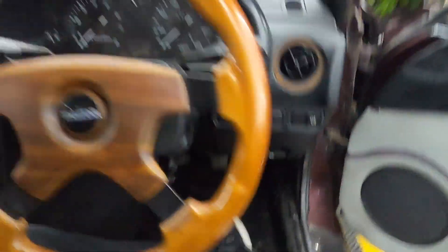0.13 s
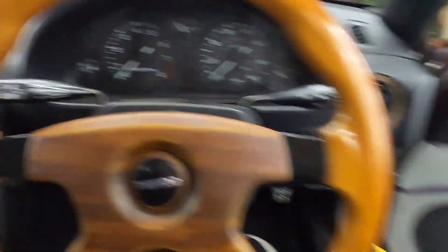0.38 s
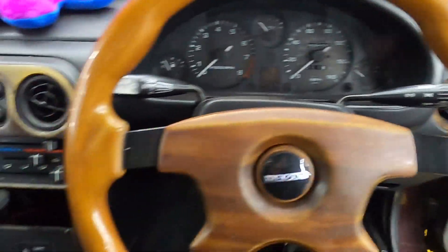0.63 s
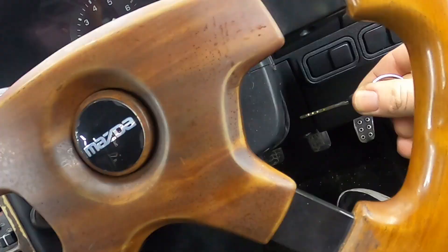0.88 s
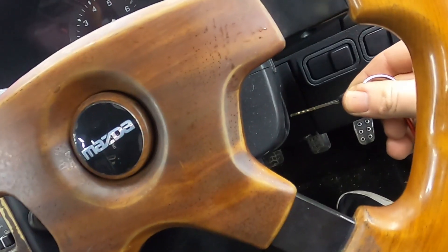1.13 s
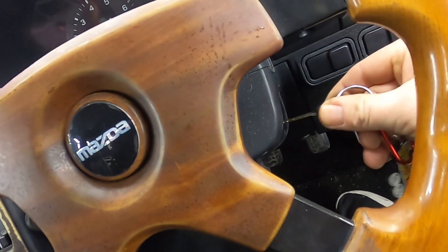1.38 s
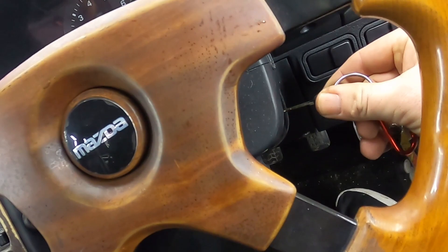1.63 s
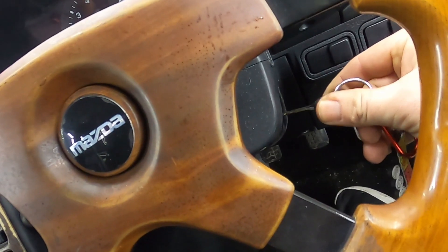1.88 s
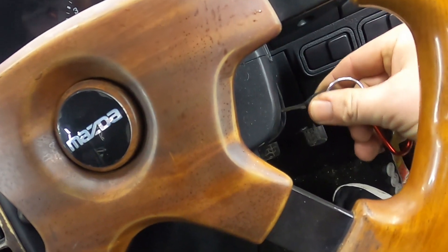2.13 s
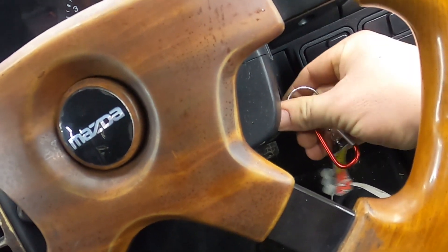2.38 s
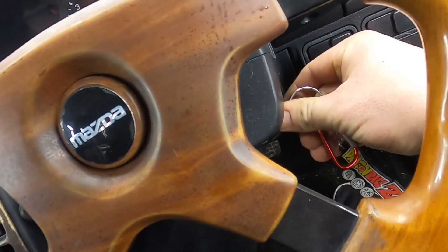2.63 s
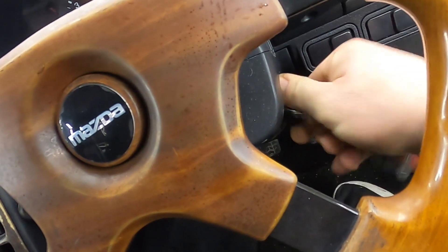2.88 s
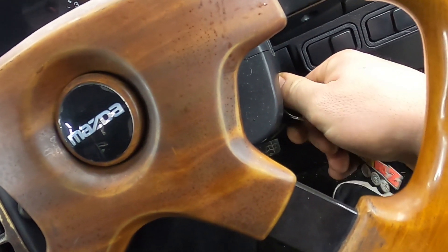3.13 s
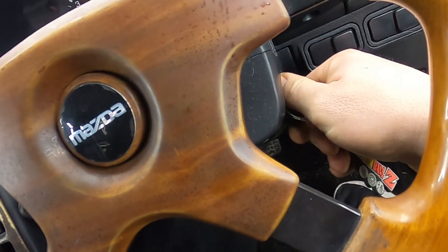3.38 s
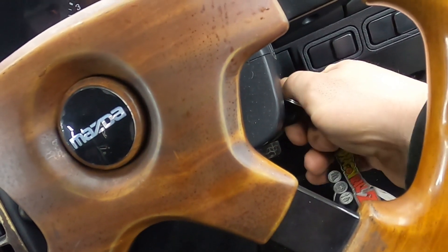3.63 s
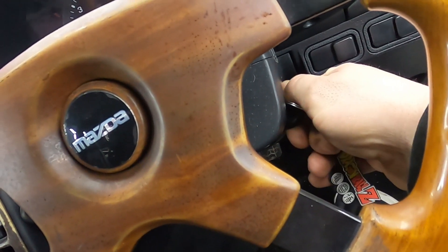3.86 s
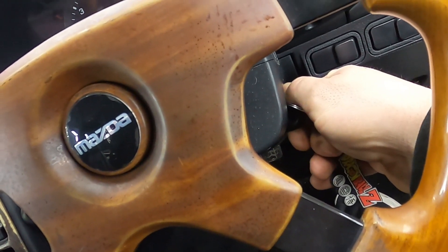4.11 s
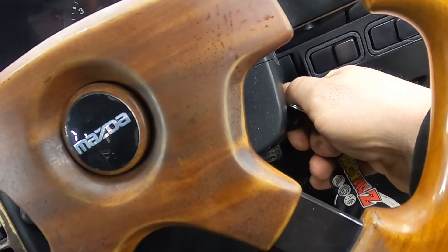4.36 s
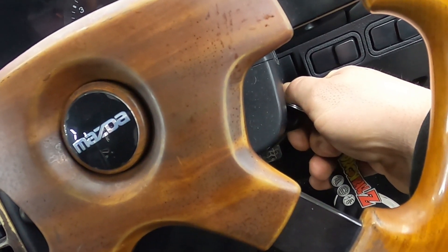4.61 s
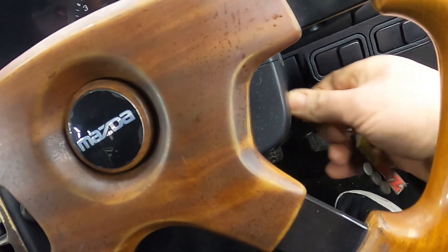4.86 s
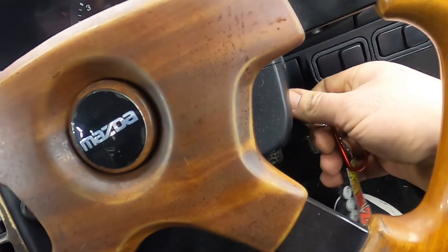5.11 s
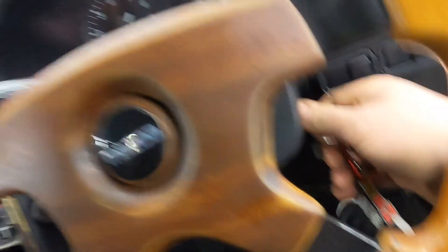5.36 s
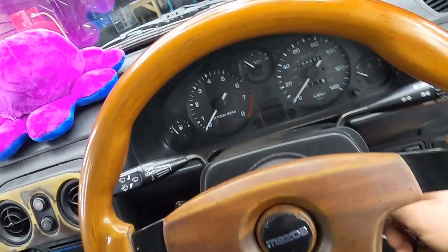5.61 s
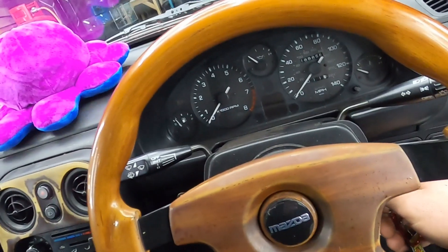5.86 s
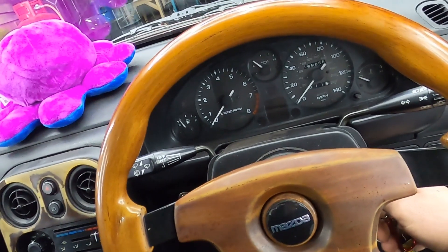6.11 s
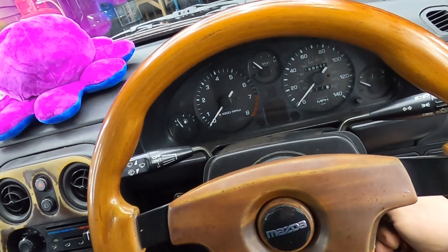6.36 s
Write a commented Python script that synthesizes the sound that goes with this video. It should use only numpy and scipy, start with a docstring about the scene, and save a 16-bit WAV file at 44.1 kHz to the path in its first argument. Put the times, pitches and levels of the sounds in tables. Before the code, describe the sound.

A hand-held microphone near the steering column hears low seat rumble, cloth and trim snaps first. Light key taps lead to a short toothy scrape and hard click, then the strongest metallic snap with a dull dash thud. Weaker clicks and tiny ring tinkles follow, another click group comes near five seconds, and a final pair ends it. Between them only a faint cabin floor, soft hum and low air puffs remain.

```python
"""Inside a parked car, close to the microphone: first sleeves and seat rustle, with dry snaps and soft bumps.
The key ring tinkles, then a key taps at the lock, slides in and is turned: noise bursts ring the lock parts.
The steering column answers with dull knocks, stops shake the dash, and later a sleeve brushes between clicks.
Throughout, random taps give a short padded cabin tail, over a quiet noise floor, two hums and deep puffs."""
import sys
import numpy as np
from scipy import signal
from scipy.io import wavfile
from scipy.ndimage import uniform_filter1d

SR = 44100
rng = np.random.default_rng(int(sys.argv[2]) if len(sys.argv) > 2 else 0)


def dump_mix(stems):
    """Bounce the given channels to the path in sys.argv[1] as a 16-bit WAV at rate SR."""
    frames = np.atleast_2d(stems).T  # one column per channel
    limited = np.clip(frames, -1, 1)  # hard clip at full scale
    pcm = np.round(limited * 32767).astype(np.int16)
    wavfile.write(sys.argv[1], SR, pcm)


def amplitude_ratio(level_db):
    """Convert a level in decibels to the matching linear amplitude (field) ratio."""
    exponent = np.asarray(level_db, float) / 20
    return 10 ** exponent


N = 286209  # samples in the scene


def evened(x):
    """Scales a sound to an rms of one."""
    return x / np.sqrt(np.mean(np.abs(x) ** 2) + 1e-20)


def read(points, hz):
    """Reads a table of points at any frequency, along a logarithmic axis."""
    f, value = np.transpose(points)
    return np.interp(np.log(hz + 1), np.log(f + 1), value)


def add(mix, start_s, sound):
    """Adds a sound to the mix in place, cut at the end of the scene."""
    part = mix[round(start_s * SR):][:len(sound)]
    part += sound[:len(part)]


def coloured(x, points, tilt_db=0):
    """Gives x a spectrum, tilted by tilt_db per octave about 4 kHz, with causal phase."""
    hz = np.abs(np.fft.fftfreq(2048, 1 / SR))
    gain_db = read(points, hz) + tilt_db * np.log2((hz + 500) / 4500)
    log_gain = np.log(amplitude_ratio(np.maximum(gain_db, -100)))
    # the Hilbert transform of the log gain is the phase that puts the energy first
    taps = np.fft.ifft(np.exp(np.conj(signal.hilbert(log_gain)))).real
    return signal.oaconvolve(x, taps[:1024])[:len(x)]


def rung(modes, phases, length_s=.4):
    """Sum of dying sines: the answer of an object to one tap."""
    t = np.arange(round(length_s * SR)) / SR
    out = 0
    for (hz, db, t60), phase in zip(modes, phases):
        fade = amplitude_ratio(db - 60 * t / max(t60, .005))
        out = out + fade * np.sin(2 * np.pi * (hz * t + phase))
    return out


def lumpy(points, patchy_db, swell_db, size):
    """Noise with a spectrum, drifting patches and a level waver shared by all bands."""
    frames, hz = 4 * N // size + 5, np.fft.rfftfreq(size, 1 / SR)
    a, b, patches = rng.standard_normal((frames, len(hz), 3)).T
    waver = evened(uniform_filter1d(rng.standard_normal(frames), size=5))
    patches = uniform_filter1d(patches, size=24, axis=0)  # broad in frequency
    patches = evened(uniform_filter1d(patches, size=36, axis=1))  # slow in time
    gain_db = read(points, hz)[:, None]
    z = (a + 1j * b) * amplitude_ratio(gain_db + patchy_db * patches + swell_db * waver)
    return evened(signal.istft(z, nperseg=size, noverlap=3 * size // 4)[1][:N])


def curve(s, db):
    """A level curve as gain per sample, down at -120 dB outside its ends."""
    gain = amplitude_ratio(np.interp(np.arange(N) / SR, s, db, left=-120, right=-120))
    return uniform_filter1d(gain, size=200)


def strokes(rows, rise_s, fade_db_per_s):
    """Gain of rubbing strokes: rise, hold, then a steady fade."""
    t = np.arange(N) / SR
    out = np.zeros(N)
    for start_s, length_s, db in rows:
        rise = np.clip((t - start_s) / rise_s, 0, 1) ** 2
        past_hold = np.maximum(t - start_s - length_s, 0)
        out += rise * amplitude_ratio(db - fade_db_per_s * past_hold)
    return out


def grit(per_s, spread_db):
    """Dense random ticks, a few of them large."""
    size = amplitude_ratio(spread_db * np.minimum(rng.exponential(1, N), 4))
    sign = rng.choice([-1., 1.], N)
    return size * sign * (rng.random(N) < per_s / SR)


def fuzzy(hz, width_hz, steady=0):
    """A narrow band of noise that follows hz, from two poles of width_hz; steady 0-1 evens out its level."""
    r = np.exp(-np.pi * width_hz / SR)
    slow = rng.standard_normal(N) + 1j * rng.standard_normal(N)
    slow = signal.lfilter([1], [1, -2 * r, r * r], slow)
    slow = slow / (np.abs(slow) + 1e-9) ** steady
    carrier = np.exp(2j * np.pi * np.cumsum(hz * np.ones(N)) / SR)
    return evened((slow * carrier).real)


def wander(top_hz):
    """Slow chance: sines of random phase, up to top_hz."""
    t = np.arange(0, N + 256, 256) / SR
    slow = 0
    for hz in np.geomspace(top_hz / 10, top_hz, num=12):
        slow = slow + np.sin(2 * np.pi * (hz * t + rng.random())) / np.sqrt(hz)
    return np.interp(np.arange(N) / SR, t, evened(slow))


def thinned(x, low_hz=95):
    """Small parts radiate no deep bass: a high-pass."""
    return signal.sosfilt(signal.butter(3, low_hz, "high", fs=SR, output="sos"), x)


# barrel and shroud resonances: (pitch_hz, damping_hz, level_db); t60 is 0.5 / damping, at least 5 ms
LOCK_MODES = [(1830, 140, 5), (4460, 200, 4), (5440, 120, 9), (6544, 28, 1.5), (7780, 450, 8)]
# spectrum of a click or scrape: (pitch_hz, level_db_per_hz)
CRACK_SPECTRUM = [(240, -21.5), (400, -2), (1090, -1.5), (1630, -11), (1900, -4.5), (3530, -6.5),
                  (5350, -11.5), (11900, -22.5), (16000, -32)]
# steering column and dash modes: (pitch_hz, level_db, t60_s)
COLUMN_MODES = [(181.2, -16, 0.4), (212.5, -0.5, 0.092), (315, -5, 0.15), (467.4, 1.5, 0.039),
                (627, 3, 0.036), (679, 10.5, 0.029), (850, 4.5, 0.068), (1012, 4, 0.048)]


def clicks(rows, t60_s, rise_s, rattle_db, top_hz):
    """Each click is a few ms of chatter through the lock; the push travels on into the column."""
    rattle_slower = 3  # loose parts rattle on, weaker and longer
    heavy_db, deepen_per_octave = -52, 0.65  # a weaker knock than this barely moves the low column modes
    lowpass = signal.butter(2, min(top_hz, .49 * SR), fs=SR, output="sos")
    out, t = np.zeros(N), np.arange(6000) / SR
    for start_s, level_db, knock_db, bright_db in rows:
        noise, phases = rng.standard_normal((3, len(t))), rng.random(40)

        # clustered micro-impacts
        clusters = np.abs(evened(uniform_filter1d(noise[2], size=16))) ** .5
        rise = np.minimum(t / rise_s, 1) ** 1.26
        fade = amplitude_ratio(-60 * t / t60_s) + amplitude_ratio(rattle_db - 60 * t / t60_s / rattle_slower)
        chatter = noise[0] * clusters * rise * fade

        # the lock parts sit differently each time
        lock = [(hz * (.95 + .1 * p), db, .5 / damping)
                for (hz, damping, db), p in zip(LOCK_MODES, phases[20:])]
        metal = signal.oaconvolve(chatter, rung(lock, phases, length_s=.06))[:len(t)]
        crack = coloured(evened(chatter) + .5 * evened(metal), CRACK_SPECTRUM, bright_db)
        crack = signal.sosfilt(lowpass, crack)
        add(out, start_s, amplitude_ratio(level_db) * crack / np.abs(crack).max())

        push = noise[1] * t * amplitude_ratio(-60 * t / 0.057)  # the heavy parts start later than the crack
        light_db = min(level_db + knock_db - heavy_db, 0)
        column = []
        for (hz, db, t60), p in zip(COLUMN_MODES, phases):
            hz = hz * (.94 + .12 * p)  # the grip shifts the modes
            octaves_below = max(np.log2(600 / hz), 0)
            column.append((hz, db + deepen_per_octave * light_db * octaves_below, t60))
        knock = signal.oaconvolve(push, rung(column, 0 * phases))
        add(out, start_s, amplitude_ratio(level_db + knock_db) * knock / np.std(knock[:900]))
    return out


# key and lock clicks: (start_s, level_db, column_knock_db relative to the click, brightness_db_per_octave)
KEY_CLICKS = [(1.503, -34.5, -21.5, 2), (1.6845, -35.5, -20.5, 8.5), (1.7927, -43, -35, -5),
              (1.9612, -44, -14.5, -3), (1.972, -41.5, -25, 5), (2.136, -49.5, -11.5, -6),
              (2.2964, -35, -27.5, 5.5), (2.3596, -30, -12, 5), (2.3991, -20, -33, 1.5),
              (2.4045, -23.5, -20, -1), (2.5402, -51, -19, 2.5), (2.9342, -36.5, -14.5, -1.2),
              (2.9688, -15, -23, 2), (2.9817, -14, -20.5, 5), (2.9998, -19, -22.5, 0.5),
              (3.3815, -46, -10.5, -2), (3.5832, -29.5, -24.5, 3), (3.6176, -29.5, -19, 0),
              (3.6235, -40, -9.5, -0.5), (3.718, -48, -26, 21), (4.807, -53, -9, 8),
              (4.8352, -31, -20, 0.5), (4.8464, -28, -12, -0.5), (4.8508, -27, -15.5, 5),
              (4.9079, -31.5, -12, 3.5), (4.9224, -44, -24, 18), (4.9678, -45.5, -5.5, 2.5),
              (5.017, -51, -2.5, 11.5), (6.335, -30, -22.5, 3), (6.3664, -25.5, -20.5, 2.5),
              (6.4557, -59.5, -2.5, 5)]


def key_clicks():
    """The key taps and turns: full-band chatter that rattles on in the loose parts."""
    return clicks(KEY_CLICKS, t60_s=0.033, rise_s=0.00195, rattle_db=-8.5, top_hz=SR)


# key blade rubbing in the barrel: (start_s, length_s, level_db)
BLADE_SLIDES = [(2.33, 0.07, -43.5), (3.37, 0.072, -63), (3.555, 0.033, -57.5), (6.315, .02, -58),
                (4.855, 0.014, -45)]


def slide():
    """The blade's teeth scrape over the pins: dense grit with the click spectrum, brightened."""
    scrape = evened(coloured(grit(per_s=6000, spread_db=1.3), CRACK_SPECTRUM, tilt_db=3.5))
    return strokes(BLADE_SLIDES, rise_s=0.014, fade_db_per_s=504) * scrape


# the key reaches a stop and shakes the whole dash: (start_s, level_db)
KEY_STOPS = [(2.399, -37.5), (2.99, -31.5), (3.6372, -50), (4.855, -39.5), (6.379, -46)]
# low modes of the dash: (pitch_hz, level_db, t60_s)
DASH_MODES = [(140, -12.5, 0.13), (170, -4, 0.24), (218.5, -1.5, 0.081)]


def stops():
    """A short uneven shake rings the low modes of the dash, a little detuned by the grip each time."""
    shake_t60_s = 0.13
    out, t = np.zeros(N), np.arange(8000) / SR
    for start_s, level_db in KEY_STOPS:
        modes = [(hz * rng.uniform(.96, 1.04), db, t60) for hz, db, t60 in DASH_MODES]
        shake = rng.standard_normal(len(t)) * amplitude_ratio(-60 * t / shake_t60_s)
        ring = signal.oaconvolve(shake, rung(modes, np.zeros(len(DASH_MODES))))
        add(out, start_s, amplitude_ratio(level_db) * ring / np.abs(ring).max())
    return out


# key ring touches: (start_s, level_db, favoured_hz)
RING_TOUCHES = [(1.26, -54.5, 6700), (3.056, -51, 6820), (3.0916, -47, 6760), (3.544, -65, 6800),
                (3.554, -54.5, 6700), (5.0044, -63, 10400), (5.029, -59, 6800), (5.051, -59, 10300)]
# modes of the small steel parts: (pitch_hz, t60_s)
RING_MODES = [(6800, 0.037), (10200, 0.039), (12230, 0.045), (14560, 0.075)]


def tinkles():
    """Small steel parts touch; the spot that is struck favours one mode."""
    out = np.zeros(N)
    for start_s, level_db, favoured_hz in RING_TOUCHES:
        modes = [(hz, -30 * abs(np.log2(hz / favoured_hz)), t60) for hz, t60 in RING_MODES]
        add(out, start_s, amplitude_ratio(level_db) * rung(modes, np.zeros(len(RING_MODES)), length_s=.2))
    return out


# dry snaps of trim or seat while settling:
# (start_s, level_db, knock_db relative to the snap, brightness_db_per_octave)
TRIM_SNAPS = [(0.0074, -29.5, -31, 10.5), (0.194, -31, -30, -6), (0.2256, -36, -10, -5),
              (0.2748, -37, -32, -2), (0.2952, -33.5, -21, 4.5), (0.301, -32.5, -27, 8.5),
              (0.307, -35, -28, 8), (0.533, -41, -12.5, -1), (0.8056, -38.5, -46, 12.5)]


def snaps():
    """Trim or seat lets go: the click mechanism, shorter and duller, with little rattle."""
    return clicks(TRIM_SNAPS, t60_s=0.0079, rise_s=0.00068, rattle_db=-22, top_hz=9600)


# soft bumps of hand and body on wheel and seat, and one short snap of trim at 1550 Hz:
# (start_s, level_db, settled_pitch_hz, t60_s)
BUMPS_AND_SNAP = [(0.1178, -28, 616, 0.027), (0.1209, -29, 171, 0.059), (0.1977, -30.5, 156, 0.029),
                  (0.2272, -36, 1550, 0.015), (0.2561, -33.5, 535, 0.063), (0.4104, -42, 996, 0.02),
                  (0.463, -41, 640, 0.077), (0.6014, -37, 511, 0.042), (0.6134, -30.5, 170, 0.048),
                  (0.8672, -44.5, 650, 0.018), (1.3087, -40.5, 560, 0.012), (1.7669, -42, 340, 0.01),
                  (2.962, -36, 606, 0.15), (3.4485, -43, 283, 0.021), (3.4794, -43, 315, 0.0082),
                  (4.971, -35.5, 562, 0.038), (5.7535, -47, 327, 0.012), (5.926, -45.5, 290, 0.028)]


def bumps_and_snap():
    """A blow rings the trim a few cycles; bending waves bring the high part first, so the pitch falls."""
    out, t = np.zeros(N), np.arange(9000) / SR
    for start_s, level_db, hz, t60_s in BUMPS_AND_SNAP:
        turns = np.cumsum(hz * (1 + 1.43 * np.exp(-t * hz / 0.22))) / SR
        # neighbouring panel modes are weaker; the higher they lie, the shorter they ring
        factor = np.r_[1, 2 ** rng.uniform(-.8, 1.1, 3)][:, None]
        weaker_db = np.r_[0, -11 * np.ones(3)][:, None]
        fade = amplitude_ratio(weaker_db - 60 * t * factor ** 2.3 / max(t60_s, .005))
        tone = (fade * np.sin(2 * np.pi * factor * turns)).sum(0)
        tone = tone * np.minimum(t * hz / 0.63, 1)  # the onset lasts 0.63 cycles of the settled pitch
        add(out, start_s, amplitude_ratio(level_db) * tone / np.abs(tone).max())
    return out


# level of the body settling in the seat: (time_s, level_db)
SETTLE_LEVEL = [(0, -42.5), (0.07, -41), (0.15, -35.5), (0.22, -47), (0.29, -43.5), (0.39, -51.5),
                (0.51, -54), (0.6, -47.5), (0.84, -63), (0.93, -59)]
# spectrum of the seat rumble: (pitch_hz, level_db_per_hz)
RUMBLE_SPECTRUM = [(15, -45), (25, -6), (119, -5), (156, -5), (324, -10), (386, -7), (480, -8),
                   (2500, -31.5), (5500, -120)]


def seat_rumble():
    """Seat and hands rumble in lumps: patchy noise and coarse grit share one low spectrum."""
    rumble = lumpy(RUMBLE_SPECTRUM, patchy_db=0.5, swell_db=0.5, size=512)
    grains = evened(coloured(grit(per_s=400, spread_db=1.5), RUMBLE_SPECTRUM))
    rumble = evened(rumble + 0.84 * grains)
    return curve(*np.transpose(SETTLE_LEVEL)) * thinned(rumble, low_hz=28)


# cloth dragged over the seat: (start_s, length_s, level_db)
CLOTH_DRAGS = [(0.0, 0.031, -53), (0.12, .17, -61), (0.37, 0.018, -72.5), (0.53, 0.026, -61),
               (0.62, 0.15, -73.5), (0.86, 0.065, -71.5)]
# spectrum of the dragged cloth: (pitch_hz, level_db_per_hz)
CLOTH_SPECTRUM = [(710, -30), (1200, -21), (2380, -8.5), (6950, -13.5), (11600, -23.5), (16000, -33)]


def cloth_drags():
    """Cloth rustles in grains as it is dragged: a quick start and a slow fade."""
    cloth = evened(coloured(grit(per_s=11000, spread_db=3.0), CLOTH_SPECTRUM))
    return strokes(CLOTH_DRAGS, rise_s=0.0016, fade_db_per_s=83) * cloth


# a sleeve brushing as the arm moves: (start_s, length_s, level_db, weave_pitch_hz)
SLEEVE_BRUSHES = [(5.463, 0.083, -68, 5800), (5.64, .18, -72.5, 3920)]
# spectrum of the sleeve: (pitch_hz, level_db_per_hz)
SLEEVE_SPECTRUM = [(1180, -10), (2000, -0.5), (5440, -2), (9020, -10.5), (14000, -15)]


def sleeve_brushes():
    """Fine grains of a sleeve, with a blurred band that the weave favours."""
    sleeve = evened(coloured(grit(per_s=8000, spread_db=1.0), SLEEVE_SPECTRUM))
    out = np.zeros(N)
    for start_s, length_s, level_db, weave_hz in SLEEVE_BRUSHES:
        gain = strokes([(start_s, length_s, level_db)], rise_s=0.023, fade_db_per_s=204)
        out += gain * (sleeve + amplitude_ratio(-3) * fuzzy(weave_hz, width_hz=1300))
    return out


# low groans, as of a seat or grip under load: (start_s, length_s, level_db, start_pitch_hz, end_pitch_hz)
LOAD_GROANS = [(0.027, 0.04, -48, 121.3, 170), (0.2, 0.067, -42.5, 459.8, 506.3),
               (0.633, 0.12, -55, 147.9, 265), (1.306, 0.13, -65.5, 440.4, 438),
               (5.756, .035, -61.5, 315, 196)]


def groans():
    """Uneven slipping under load: a blurred note that glides a little."""
    out, t = np.zeros(N), np.arange(N) / SR
    for start_s, length_s, level_db, from_hz, to_hz in LOAD_GROANS:
        gain = strokes([(start_s, length_s, level_db)], rise_s=0.011, fade_db_per_s=505)
        glide_hz = np.interp(t, [start_s, start_s + length_s], [from_hz, to_hz])
        out += gain * fuzzy(glide_hz, width_hz=52, steady=.6)
    return out


# main decay of the cabin tail: (pitch_hz, t60_s)
CABIN_DECAY = [(150, 0.27), (600, 0.14), (2500, 0.1), (7000, 0.07), (14000, 0.087)]


def cabin(x):
    """Sparse taps of random sign, each band dying at its own speed; one tail for the sum, one for the sides."""
    taps = np.zeros((2, SR // 2))
    at = np.arange(100, SR // 2 - 20, 20)
    at = at + rng.integers(0, 20, (2, len(at)))
    np.put_along_axis(taps, at, rng.choice([-1., 1.], at.shape), axis=1)
    hz, t, z = signal.stft(taps, SR, nperseg=128)
    fall_db = -60 * t / np.maximum(read(CABIN_DECAY, hz), .02)[:, None]
    fade = amplitude_ratio(fall_db) + amplitude_ratio(-11.5 + fall_db / 4.8)  # panels and boot space ring on faintly
    tail = signal.istft(z * fade, SR, nperseg=128)[1]
    mid, side = signal.fftconvolve(x[None], tail / np.linalg.norm(tail[0]), axes=1)[:, :N]
    # the microphone ports lie close together, so the sides differ mostly in the treble
    side = amplitude_ratio(-12.0) * coloured(side, [(300, -40.0), (3000, -10.0), (12000, 2.5)])
    return np.array([mid + side, mid - side])


# spectrum of the quiet floor: (pitch_hz, level_db_per_hz)
FLOOR_SPECTRUM = [(18, -57), (30, 7.5), (64, -6.5), (194, -4), (374, -7.5), (499, 0), (666, -4),
                  (1040, -7.5), (1590, -15), (4780, -18), (8080, -25.5), (16000, -29.5)]
# floor, left minus right against the sum: (pitch_hz, level_db)
FLOOR_SPREAD = [(60, -4.5), (180, -17.5), (550, -27), (1650, -16.5), (4970, -9.5), (15000, -1)]


def floor():
    """Muffled outdoors and microphone hiss: patchy noise, with separate noise for the faint side difference."""
    mid = lumpy(FLOOR_SPECTRUM, patchy_db=1.3, swell_db=0.4, size=2048)
    hz = np.array(FLOOR_SPECTRUM)[:, 0]
    side_spectrum = np.c_[hz, read(FLOOR_SPECTRUM, hz) + read(FLOOR_SPREAD, hz)]
    side = coloured(rng.standard_normal(N), side_spectrum)
    side = side / np.std(coloured(rng.standard_normal(N), FLOOR_SPECTRUM))
    return amplitude_ratio(-68) * np.array([mid + side, mid - side])


# the cabin air favours two notes of the floor: (centre_pitch_hz, pole_width_hz, centre_level_db)
CABIN_NOTES = [(467, 60, -77.5), (762, 59, -79.5)]


def hum():
    """Blurred notes of the closed cabin that wander in pitch and level."""
    out = np.zeros(N)
    for hz, width_hz, level_db in CABIN_NOTES:
        gain = amplitude_ratio(level_db + 3.0 * wander(top_hz=2.7))
        out += gain * fuzzy(hz * (1 + .04 * wander(top_hz=2.5)), width_hz)
    return out


# spectrum of the deep puffs: (pitch_hz, level_db_per_hz)
PUFF_SPECTRUM = [(8, -2), (25, 3), (50, -7), (100, -37.5)]


def puffs():
    """Deep rumble that comes and goes, as of air moving past the hand-held microphone."""
    gain = amplitude_ratio(-84.5 + 7 * wander(top_hz=2.9))
    return gain * lumpy(PUFF_SPECTRUM, patchy_db=-2.5, swell_db=1, size=4096)


def scene():
    """Bumps reach the hand-held microphone mostly through solids, so the cabin echoes them less."""
    near = thinned(snaps() + key_clicks() + slide())
    near = near + tinkles() + seat_rumble() + cloth_drags() + sleeve_brushes()
    felt = thinned(bumps_and_snap() + stops() + groans())
    direct = amplitude_ratio(-2.0) * near + felt
    tail = amplitude_ratio(-13.0) * cabin(near + amplitude_ratio(-0.5) * felt)
    return direct + tail + floor() + hum() + puffs()


def roll_off(x):
    """The treble ends steeply here."""
    return signal.sosfilt(signal.butter(12, 16650, fs=SR, output="sos"), x)


def record(dry):
    """Limits the band to about 16 kHz with a steep linear-phase filter and finishes the mix."""
    edge = signal.firwin(301, 16050, window=("kaiser", 8), fs=SR)
    mix = signal.oaconvolve(dry, edge[None], "same")
    return roll_off(mix)


dry = scene()
out = record(dry)
dump_mix(out)
```